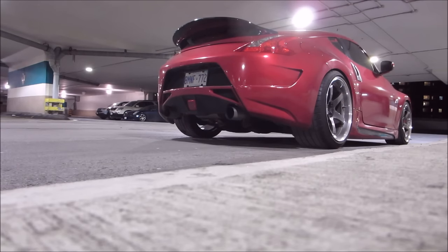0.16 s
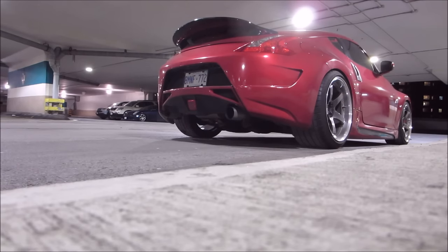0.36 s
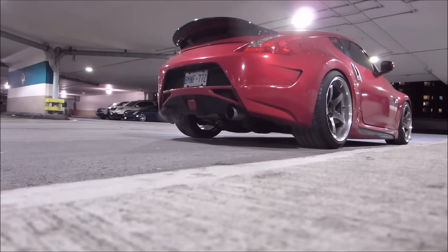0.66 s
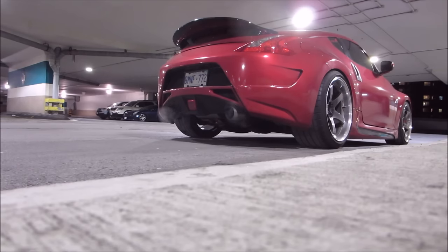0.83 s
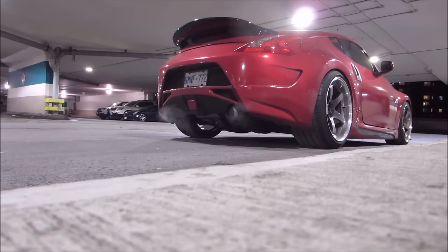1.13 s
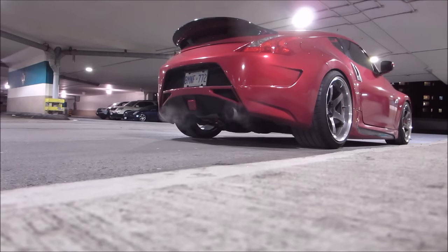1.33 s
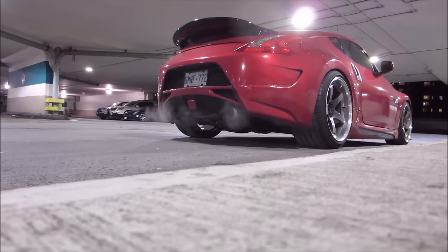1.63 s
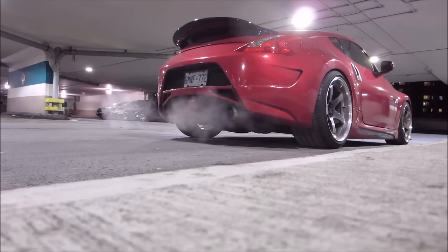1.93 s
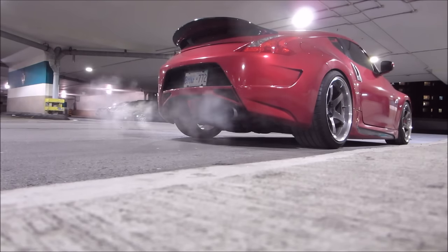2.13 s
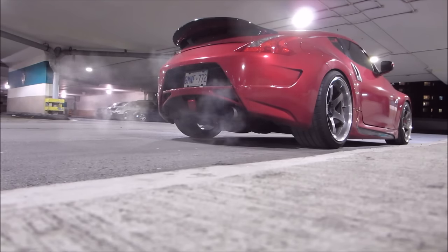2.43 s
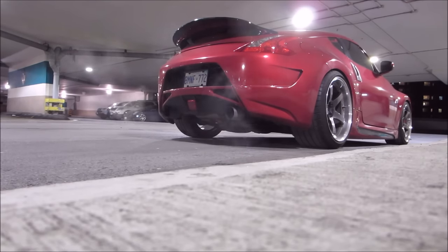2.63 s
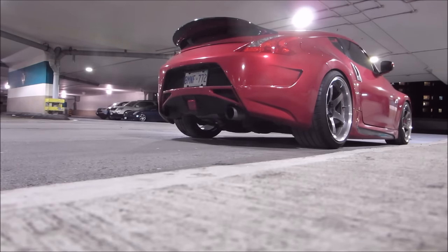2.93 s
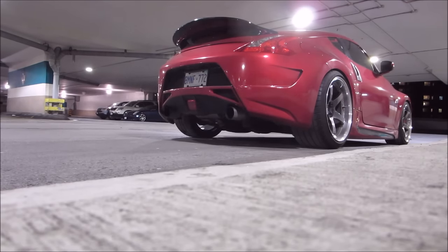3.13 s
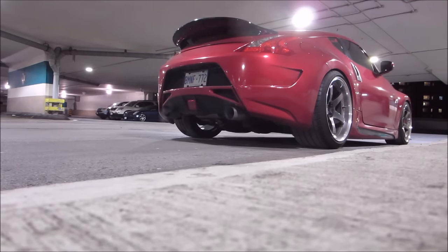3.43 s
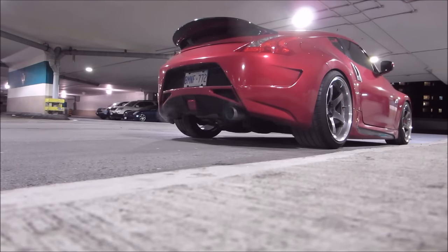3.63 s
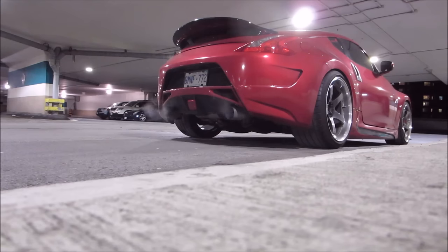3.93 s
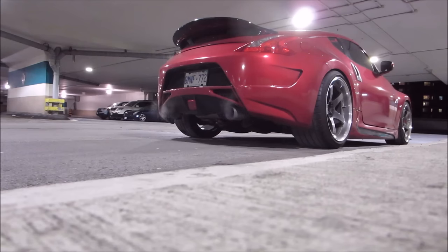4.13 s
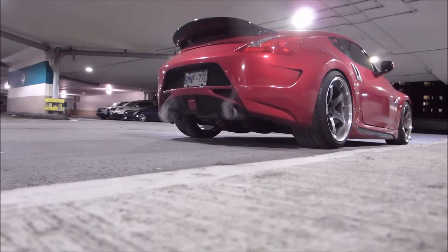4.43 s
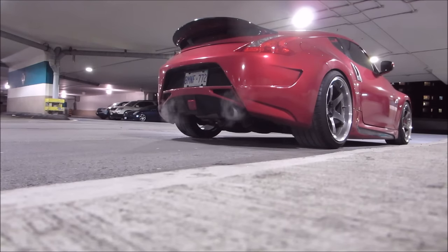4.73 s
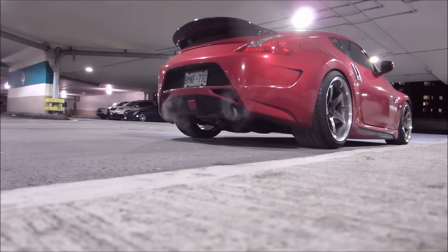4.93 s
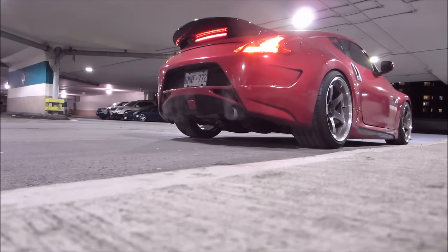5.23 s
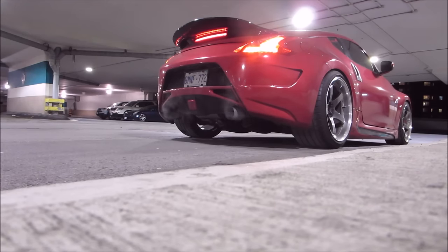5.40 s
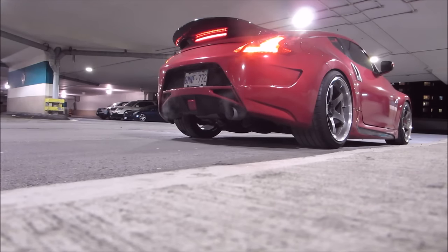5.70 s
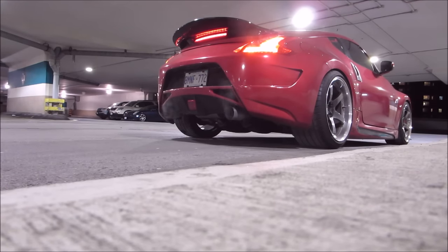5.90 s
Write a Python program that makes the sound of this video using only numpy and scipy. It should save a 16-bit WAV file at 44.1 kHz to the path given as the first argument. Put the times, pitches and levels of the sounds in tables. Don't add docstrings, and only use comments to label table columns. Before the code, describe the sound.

Raspy sports exhaust falling from one rev, blipped sharply again, popping on the overrun and settling to an uneven low burble in an echoing garage.

```python
import sys
import numpy as np
from scipy import signal
from scipy.fft import rfft, irfft, next_fast_len
from scipy.io import wavfile
from scipy.ndimage import uniform_filter1d, map_coordinates

SR = 44100
rng = np.random.default_rng(int(sys.argv[2]) if len(sys.argv) > 2 else 0)


def level_to_linear(level):
    exponent = np.asarray(level, float) / 20
    return 10 ** exponent


def put_to_file(sound):
    columns = np.atleast_2d(sound).T
    safe = np.clip(columns, -1, 1)
    whole_steps = np.round(safe * 32767)
    wavfile.write(sys.argv[1], SR, whole_steps.astype(np.int16))


N = 267246
STEP = 16

# [t/s, level/dB]
HUM = [(0, -54), (.9, -50), (1.2, -45), (1.8, -46), (1.9, -55), (2.35, -55), (2.5, -42), (4.4, -41),
       (4.8, -45), (6.06, -41)]
HUM_HZ, HUM_WIDTH_HZ = 65, 18
# [f/Hz, t60/s]
GARAGE_T60 = [(60, 0.32), (200, 1.37), (600, 0.34), (2000, 0.21), (8000, 0.69)]
# [f/Hz, likeness 0-1]
ALIKE = [(60, 1), (300, 0.9814), (700, 0.92), (1500, 0.78), (3000, 0.55), (6000, 0.061), (15000, 0.25)]
# [f/Hz, level/dB]
ECHO_COLOUR = [(200, 0), (800, 0), (1500, -5), (3000, -9), (16000, -12)]
# [f/Hz, level/dB]
DRAUGHT = [(15, -18.0), (35, 7.0), (70, -23), (200, -77.5)]

# [t/s, f/Hz, length/s, level/dB]
SQUEAKS = [
    (3.93, 1200, .06, -56),
    (5.655, 3470, .14, -60),
    (5.895, 5900, .03, -65),
    (5.9, 8000, .02, -72),
]

# [peak t/s, swell by 20 dB/s, fall by 20 dB/s, level/dB]
GASPS = [
    (0, .1, 0.02, -45),
    (.16, 2.5, .15, -52),
    (1.37, 0.7, .03, -63.5),
    (1.79, 0.05, 0.8, -59),
    (2.065, .5, .05, -50),
    (2.673, .01, .12, -57),
    (2.736, 0.01, .12, -55),
    (2.78, .01, .15, -57),
    (3.65, .5, 0, -63),
    (5.9, 0.6, 0.8, -68.5),
]
# [f/Hz, level/dB]
INTAKE_COLOUR = [(2000, -37), (4000, 2.5), (5500, 8), (7800, 4.5), (9000, 2.5), (11000, 2.5), (14000, -3),
                 (16000, -9.5)]
INTAKE_DB, INTAKE_DB_PER_OCTAVE = -63, 6.5
TOP_FIRINGS_HZ = 200

# [t/s, crack peak level/dB, ring over crack level/dB, thud level/dB]
POPS = [(.188, -33, 24, -24), (.0105, -40, 28, -24), (.22, -42, 27, -28), (1.8225, -46, 36, -26),
        (1.830, -32, 28.5, -18), (1.8625, -26, 21.5, -24), (1.871, -27, 21, -24), (2.128, -35, 16, -28),
        (2.647, -30, 28, -14), (2.6645, -39, 31, -18), (2.670, -37, 32, -16), (2.7322, -24.5, 23, -13),
        (2.776, -35, 26, -16), (2.8016, -33, 30, -14)]
# [f/Hz, level/dB]
CRACK = [(500, -24), (900, -4), (1300, 0), (1650, -7), (2300, -7), (3500, -12), (5500, -20), (9000, -32),
         (16000, -60)]
# [f/Hz, level/dB]
THUD = [(25, -30), (60, -8), (150, -9), (255, 0), (330, -12), (600, -45), (2000, -100)]
# [t/s, peak level/dB]
CLICKS = [(.113, -44), (.143, -43), (.173, -45), (1.946, -38), (1.9525, -37), (1.9585, -28), (1.9763, -29),
          (1.988, -26), (1.990, -29), (1.994, -30), (1.9963, -27), (2.000, -27), (2.0075, -28),
          (2.020, -26), (2.022, -16), (2.0245, -31), (2.032, -41), (2.054, -41), (2.6478, -51),
          (2.6708, -55), (2.7328, -45), (2.7347, -48), (2.777, -54), (2.8025, -50)]
# [f/Hz, level/dB]
CLICK_COLOUR = [(1200, -30), (3000, 0), (12000, 0), (20000, -8)]
# [t/s, peak level/dB]
TEARS = [(1.8468, -26), (1.8917, -29), (1.9057, -23), (1.9131, -26), (1.9196, -21), (1.9322, -21),
         (1.9448, -19), (1.9514, -18), (1.9584, -19), (1.9758, -17), (1.9877, -11), (1.9925, -16),
         (1.996, -11), (2.0071, -12), (2.0154, -22), (2.0216, -11), (2.0313, -24), (2.0422, -23),
         (2.0483, -22), (2.0538, -24), (2.0855, -29), (2.102, -27), (2.1093, -27)]
# [t/s, peak level/dB]
SURGES = [(0.058, -7), (0.111, -7), (0.127, -9), (0.137, -6), (0.244, -9), (0.273, -8), (0.306, -9),
          (0.417, -13), (0.451, -16), (0.485, -10), (0.562, -12), (0.624, -14), (0.658, -14), (0.791, -18),
          (0.826, -25), (0.883, -19), (0.925, -23), (0.968, -22), (1.018, -24), (1.098, -21), (1.149, -21),
          (1.23, -22), (1.252, -19), (1.356, -29), (1.443, -25), (1.657, -26), (1.714, -18), (1.746, -12),
          (1.786, -8), (1.804, -7), (1.813, -1), (2.189, -11), (2.235, -12), (2.27, -9), (2.341, -13),
          (2.371, -16), (2.472, -15), (2.492, -11), (2.553, -12), (2.614, -15), (2.871, -14), (2.916, -15),
          (2.964, -17), (3.061, -22), (3.126, -22), (3.16, -22), (3.247, -24), (3.286, -23), (3.378, -22),
          (3.43, -22), (3.496, -26), (3.569, -25), (3.627, -29), (3.664, -24), (3.751, -25), (3.785, -29),
          (4.035, -32), (4.086, -33), (4.23, -36), (4.385, -35)]
SURGE_DB, DULL_HZ = -4, 1400
BOUNCE_S, BOUNCE = .00053, .6
WALL_S, WALL_DB = .008, -12

# [t/s, firing rate f/Hz]
SPEED = [(0, 214.1), (.29, 182), (.62, 145.7), (.99, 109.1), (1.35, 78.98), (1.63, 76), (1.76, 100),
         (2.04, 186.1), (2.16, 199.5), (2.27, 198.5), (2.48, 173), (2.73, 172.5), (2.9, 142.9),
         (3.07, 132.6), (3.66, 73.47), (4.14, 55.5), (4.66, 44.65), (5.08, 41.61), (6.06, 38.49)]
FIRES_AT_S = 1.9194
# [t/s, level/dB]
EFFORT = [(0, -15.5), (.22, -21), (.44, -28), (.7, -28.5), (.95, -40.5), (1.25, -35.5), (1.45, -43),
          (1.62, -42), (1.75, -22), (1.93, -6), (2.04, -9), (2.17, -20), (2.45, -31), (2.5, -23),
          (2.61, -28), (2.72, -29), (2.8, -25), (2.87, -31), (3.16, -37), (3.6, -38.5), (4.1, -48.5),
          (6.06, -46.5)]
# [level/dB, times unevenness]
CYLINDERS = [5, -3, -2.5, -2, 0.4, 0]
# [t/s, unevenness 0-1]
UNEVEN = [(0, 0.49), (1.5, 0.49), (1.7, 0.01), (1.95, 0.19), (2.1, 0.37), (2.9, 0.52), (4.4, 0.29),
          (6.06, 0.5)]
# [t/s, level/dB]
LUMPS = [(3.963, -23), (4.059, -23), (4.136, -23), (4.233, -23), (4.363, -24), (4.427, -22), (4.502, -23),
         (4.543, -22), (4.587, -24), (4.609, -22), (4.715, -23), (4.75, -23), (4.794, -23), (4.867, -23),
         (4.941, -23), (4.982, -21), (5.013, -23), (5.028, -22), (5.125, -21), (5.154, -23), (5.176, -21),
         (5.224, -21), (5.273, -23), (5.321, -23), (5.374, -24), (5.421, -23), (5.49, -22), (5.56, -24),
         (5.643, -23), (5.673, -23), (5.707, -23), (5.794, -24), (5.85, -24), (5.916, -24), (5.966, -24),
         (6.02, -23), (6.038, -23)]
LUMP_WIDTH_S, LUMP_OVER_DB, BETWEEN_DB = .009, 27, -3

# [f/Hz, width f/Hz, level/dB, growth dB per dB of effort, effort where growth stops level/dB]
BOOM = [(88, 68, -24, 0.4, -23), (134.37, 34.1, -10, 0.31, -26), (184, 49.3, -8, 0.47, -24.5),
        (276, 36, -10, .55, -21), (390, 90, -10, .6, 0), (490, 90, -3, .7, 0), (625, 80, -4, .7, 0),
        (735, 70, -6, .7, 0), (870, 60, -14, .6, 0)]
# [multiple, level/dB, dB per dB of lock; misfires feed the half multiple]
ORDERS = [(1, 0, 1), (1.5, -11.5, -.6), (2, -1.5, 1), (3, -4, .6), (4, -7, .6), (5, -9, .6), (6, -12, .6)]
# [t/s, level/dB]
LOCK = [(0.06, -11), (.12, 0), (.43, 4.5), (.52, -5), (.7, 0), (.8, -1), (.92, -7), (1.3, 0.5), (1.42, -9),
        (1.57, -8), (1.7, 3), (2.02, -6), (2.18, 2), (2.35, -8), (2.45, -13), (2.53, -2), (2.65, 3.5),
        (2.72, -13), (2.88, -4), (3.04, -1), (3.14, -10), (3.42, -5), (3.55, 2), (4.0, -8), (4.55, -.5),
        (5.3, -3), (6.06, -2)]

# [f/Hz, width f/Hz, level/dB]
PIPE = [(276, 100, 0), (424, 70, -1), (511, 75, 7), (630, 55, 2.5), (698, 35, -5), (740, 60, 0),
        (868, 50, -9), (1237, 90, -6.5), (1398, 50, -7.5)]
NOTCH_HZ, NOTCH_WIDTH_HZ, NOTCH_DB = 1030, 260, -7
# [f/Hz, level/dB]
MUFFLER = [(18, -69), (30, -27), (97, -10), (128, -4), (177, 4.5), (225, -13), (274, -12.5), (302, -19.5),
           (351, -36), (400, -32), (520, -88), (880, -120)]
THUMP_DB, THUMP_GROWS, THUMP_DB_PER_OCTAVE, THUMP_FULL_DB = -17, .3, -1.16, -24.5
# [f/Hz, level/dB]
FRONT = [(500, -24), (950, 1), (1350, 4), (1700, -3), (2400, -8), (3500, -17), (5500, -29), (16000, -60)]
# [f/Hz, level/dB]
GAS_COLOUR = [(180, -48.5), (300, -2.5), (374, -1), (406, -4), (472, -8), (580, -4), (800, -10.5),
              (1000, -11.5), (1300, -15), (1650, -19.5), (2500, -24.5), (3460, -30), (8000, -51),
              (10400, -73), (17600, -120)]
RASP_DB, RASP_GROWS, RASP_DB_PER_OCTAVE = -21, 0.83, 4
# [t/s, level/dB]
CLATTER = [(0, -53.5), (4.5, -54.5), (6.06, -49)]
SNAP_S, SNAP_WIDTH_S, SNAP_DB = 1.995, .035, -16


def unit(x):
    return x / np.sqrt(np.mean(x ** 2) + 1e-20)


def powersum(*db):
    return 10 * np.log10(sum(level_to_linear(d) ** 2 for d in db))


def along(points, hz):
    f, value = np.transpose(points)
    return np.interp(np.log(hz + 1), np.log(f + 1), value)


def curve(points):
    s, value = np.transpose(points)
    return np.interp(np.arange(N) / SR, s, value)


def fine(x):
    return np.interp(np.arange(N), np.arange(len(x)) * STEP, x)


def wobble(rate):
    knots = rng.standard_normal(int(N * rate / SR) + 4)
    return map_coordinates(knots, [np.arange(0, N, STEP) * rate / SR])


def filtered(x, response):
    m = next_fast_len(x.shape[-1] + SR // 2)
    return irfft(rfft(x, m) * response(np.fft.rfftfreq(m, 1 / SR)), m)[..., :x.shape[-1]]


def causal(spectrum):
    def response(hz):
        cepstrum = irfft(np.log(level_to_linear(along(spectrum, hz)) + 1e-5))
        half = len(cepstrum) // 2
        cepstrum[1:half] *= 2
        cepstrum[half + 1:] = 0
        return np.exp(rfft(cepstrum))
    return response


def resonance(f, centre, width):
    return 1j * f * width / (centre * centre - f * f + 1j * f * width)


def stereo(two, spectrum):
    def response(hz):
        turn = np.arccos(np.clip(along(ALIKE, hz), -1, 1)) / 2
        return level_to_linear(along(spectrum, hz)) * [np.cos(turn), np.sin(turn)]
    mid, side = filtered(two, response)
    return unit(np.array([mid + side, mid - side]))


def hum():
    noise = rng.standard_normal(N)
    wave = filtered(noise, lambda f: resonance(f, HUM_HZ, HUM_WIDTH_HZ) ** 2)
    return level_to_linear(curve(HUM)) * unit(wave)


def garage(x, delay, build):
    hz, t, z = signal.stft(rng.standard_normal((2, SR)), SR, nperseg=512)
    t60 = along(GARAGE_T60, hz)[:, None]
    tail = signal.istft(z * level_to_linear(-60 * t / t60) / np.sqrt(t60), SR, nperseg=512)[1]
    thicken = 1 - np.exp(-np.arange(tail.shape[1]) / SR / build)
    tail = stereo(tail * thicken, ECHO_COLOUR)
    late = np.pad(x, (round(delay * SR), 0))[None]
    return signal.fftconvolve(late, tail / np.sqrt(tail.shape[1]), axes=1)[:, :N]


def linkage():
    t, slow = np.arange(N) / SR, np.arange(0, N, STEP) / SR
    out = 0
    for s, hz, length, db in SQUEAKS:
        swell = np.exp(-((slow - s) / length * 2) ** 4)
        level = fine(level_to_linear(db + 3 * wobble(150)) * swell)
        out = out + level * np.sin(2 * np.pi * hz * t + fine(1.1 * wobble(440)))
    return out


def intake(turns, octaves):
    t = np.arange(0, N, STEP) / SR
    chop = 1 + .3 * np.cos(2 * np.pi * turns / 6) ** 8
    with np.errstate(divide="ignore", invalid="ignore"):
        gasps = [db - 20 * np.maximum((s - t) / swell, (t - s) / fall) for s, swell, fall, db in GASPS]
    steady_db = INTAKE_DB + INTAKE_DB_PER_OCTAVE * octaves[::STEP]
    rush_db = powersum(steady_db, *np.maximum(gasps, -120))
    return fine(level_to_linear(rush_db + 1.93)) * chop * stereo(rng.standard_normal((2, N)), INTAKE_COLOUR)


def pipe(f):
    modes = sum(level_to_linear(db) * resonance(f, centre, width) for centre, width, db in PIPE)
    notch = 1 - (1 - level_to_linear(NOTCH_DB)) * resonance(f, NOTCH_HZ, NOTCH_WIDTH_HZ)
    low_cut = (1j * f / (110 + 1j * f)) ** 2
    return modes * notch * low_cut / (1 + 1j * f / 1900) ** 3 / (1 + 1j * f / 3300) ** 2


def darken(f):
    return 1 / (1 + 1j * f / DULL_HZ) ** 2


def dull(f):
    return pipe(f) * darken(f)


def struck(events, response, tear_s=0):
    out = np.zeros(N + SR)
    blow = -filtered(np.arange(8192) == 0, response)
    t = np.arange(256) / SR
    for s, db in events:
        hit = blow
        if tear_s:
            grit = np.where(t > 0, .28 * rng.standard_normal(len(t)), 1)
            hit = np.convolve(blow[:2048], grit * np.exp(-t / tear_s))
        out[round(s * SR):][:len(hit)] += level_to_linear(db) * hit / np.abs(hit).max()
    return out[:N]


def both_ears(events, response, lean_db, lag_s, left_db, tear_s):
    lean = rng.standard_normal((len(events), 2))
    shared = struck(events, response, tear_s)
    own = []
    for side in (1, -1):
        heard = [(s + side * b * lag_s, db + side * (lean_db * a + left_db))
                 for (s, db), (a, b) in zip(events, lean)]
        own.append(struck(heard, response, tear_s))
    return .5 * shared + .52 * np.array(own)


def backfires():
    crack = struck([(s + .0008, db + 7) for s, db, *_ in POPS], causal(CRACK), tear_s=.0002)
    crack = crack + BOUNCE * np.roll(crack, round(BOUNCE_S * SR))
    surges = level_to_linear(SURGE_DB) * struck(SURGES, dull)
    ring = struck([(s + .0006, db + ring_db + 1) for s, db, ring_db, _ in POPS], pipe)
    thud = struck([(s, thud_db) for s, *_, thud_db in POPS], causal(THUD))
    floor = np.roll(.22 * ring + .3 * crack, round(.0019 * SR))
    wall = level_to_linear(WALL_DB) * np.roll(filtered(1.7 * ring + .3 * crack, darken), round(WALL_S * SR))
    clicks = level_to_linear(14) * both_ears(CLICKS, causal(CLICK_COLOUR), lean_db=1.5, lag_s=.00005, left_db=1.2,
                                 tear_s=.00025)
    tears = level_to_linear(8.5) * both_ears(TEARS, causal(FRONT), lean_db=.8, lag_s=.00003, left_db=-.6, tear_s=.0003)
    middle = tears.mean(0)
    return surges + crack + ring + thud + floor + wall + middle, clicks + tears - middle


def lumpy():
    t = np.arange(0, N, STEP) / SR
    bumps = [(db + LUMP_OVER_DB) * np.exp(-((t - s) / LUMP_WIDTH_S) ** 2) for s, db in LUMPS]
    sag_db = BETWEEN_DB * np.clip((t - LUMPS[0][0]) * 10 + 1, 0, 1)
    return fine(level_to_linear(1.1 * np.max(bumps, axis=0) + sag_db))


def boom(hz, effort_db):
    power = 0
    for centre, width, db, grows, full_db in BOOM:
        peak = level_to_linear(db + grows * np.minimum(effort_db, full_db))
        power = power + peak ** 2 / (1 + (2 * (hz - centre) / width) ** 2) ** 2
    return np.sqrt(power)


def drone(turns, firing_hz, effort_db):
    lock_db = curve(LOCK)[::STEP]
    tone = 0
    for k, db, follows in ORDERS:
        unsteady_db = 1.8 * wobble(12) + .4 * k * wobble(30) - .15 * k
        level = boom(k * firing_hz[::STEP], effort_db[::STEP]) * level_to_linear(follows * lock_db + db + unsteady_db)
        drift = fine(0.22 * (k + .5) * wobble(19))
        tone = tone + np.sqrt(2) * fine(level) * np.sin(2 * np.pi * k * turns + drift)
    return tone


def firings(turns, uneven, scatter_db, late):
    at = np.flatnonzero(np.diff(np.floor(turns)))
    gap = np.gradient(at)
    chance = rng.standard_normal((len(at), 2))
    size_db = 2.2 * np.resize(CYLINDERS, len(at)) + scatter_db * chance[:, 0]
    size = level_to_linear(uneven[at] * size_db)
    at = np.clip(at + late * uneven[at] * gap * chance[:, 1], 0, N - 1).astype(int)
    return unit(np.bincount(at, size * np.sqrt(gap), N))


def exhaust(turns, octaves, bark_db, lumps):
    thump_db = THUMP_DB + THUMP_GROWS * np.minimum(bark_db, THUMP_FULL_DB) + THUMP_DB_PER_OCTAVE * octaves
    from_snap = np.abs(np.arange(N) / SR - SNAP_S) / SNAP_WIDTH_S
    snap_db = SNAP_DB - 20 * np.minimum(from_snap, 3) ** 2
    flow_db = RASP_DB + RASP_GROWS * bark_db + RASP_DB_PER_OCTAVE * octaves
    rasp_db = powersum(flow_db, curve(CLATTER), snap_db)

    pulses = -firings(turns, np.clip(curve(UNEVEN), 0, 1), scatter_db=4.5, late=.12)
    puff = rng.standard_normal((4, N)) * (1.48 + np.exp(-4 * (turns % 1)))
    steep = np.clip((bark_db + 26) / 12, 0, 1)
    picking_up = np.gradient(octaves) * SR > 1.5
    loaded = steep * uniform_filter1d(1. * picking_up, size=2000)

    thump = lumps * level_to_linear(thump_db - 6.8) * unit(filtered(pulses + 0.43 * puff[0], causal(MUFFLER)))
    blown = pulses + 0.42 * (1 - 0.69 * steep) * puff[1]
    sharp, soft = filtered(blown, lambda f: [pipe(f), dull(f)])
    bark = level_to_linear(bark_db - 1) * unit(loaded * sharp + (1 - loaded) * soft)
    front = level_to_linear(flow_db + 2.5) * loaded ** 2 * unit(filtered(pulses, causal(FRONT)))
    gas = level_to_linear(rasp_db + 8) * (1 - .65 * steep + .3 * loaded) * stereo(puff[2:], GAS_COLOUR)
    beam = .45 + .55 * steep
    return thump + beam * bark + front + gas, thump + bark + front


def scene():
    firing_hz, effort_db = curve(SPEED), curve(EFFORT)
    octaves = np.log2(firing_hz / TOP_FIRINGS_HZ)
    turns = np.cumsum(firing_hz) / SR
    turns = turns - turns[round(FIRES_AT_S * SR)] % 1
    lumps = lumpy()
    tone = lumps * drone(turns, firing_hz, effort_db)
    near, spread = exhaust(turns, octaves, effort_db, lumps)
    pops, fronts = backfires()
    send = level_to_linear(-9) * spread + level_to_linear(-19) * tone + level_to_linear(-9) * pops
    echoes = garage(send, delay=.006, build=.02)
    return tone + near + pops + echoes + fronts + intake(turns, octaves) + linkage() + hum()


def band_limit(x):
    return signal.sosfilt(signal.butter(12, 15750, fs=SR, output="sos"), x)


def record(dry):
    heard = filtered(dry, lambda hz: (1j * hz / (55 + 1j * hz)) ** 2)
    draught = filtered(rng.standard_normal(dry.shape), lambda hz: level_to_linear(along(DRAUGHT, hz)))
    heard = np.array([level_to_linear(-.15) * np.roll(heard[0], 1), heard[1]])
    heard = heard + level_to_linear(-66.5) * unit(draught) + level_to_linear(-77.5) * rng.standard_normal(dry.shape)
    recent = signal.lfilter([1 / 2000], [1, 1 / 2000 - 1], np.mean(heard ** 2, 0))
    ceiling = .73 + .45 * np.exp(-(recent / .06) ** 4)
    held = heard / (1 + np.abs(heard / ceiling) ** 6) ** (1 / 6)
    held = filtered(held, lambda hz: hz < 15780)
    return band_limit(held)


dry = scene()
out = record(dry)
put_to_file(out)
```